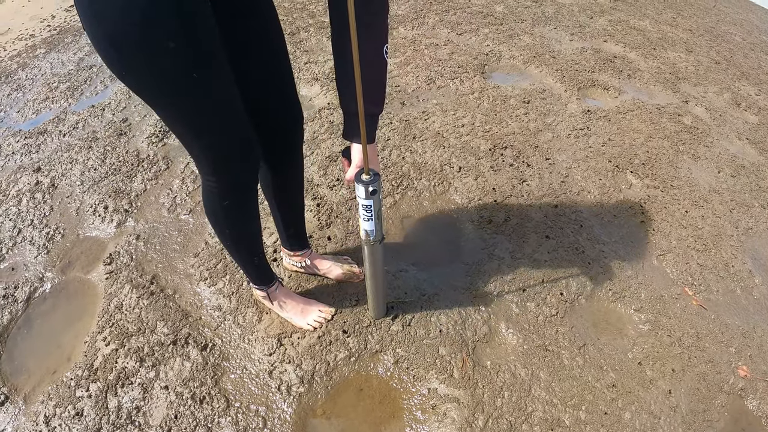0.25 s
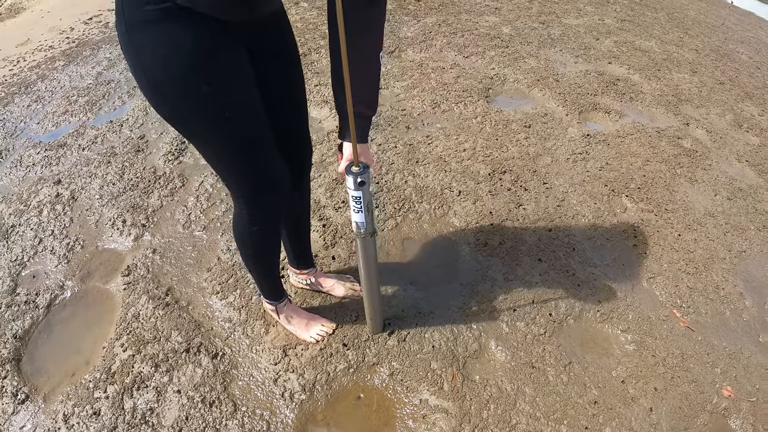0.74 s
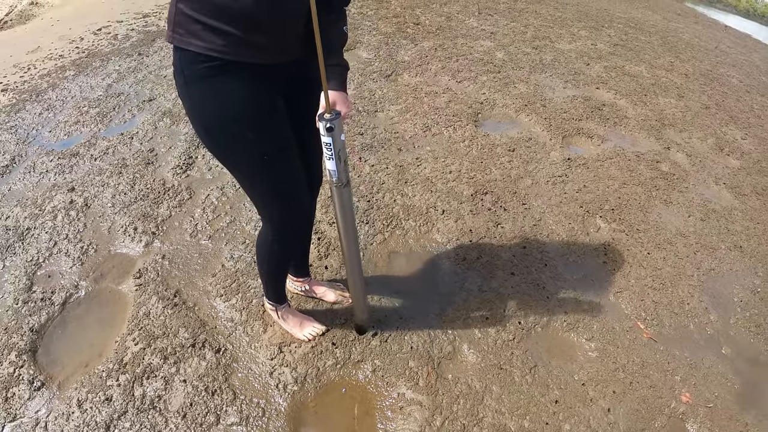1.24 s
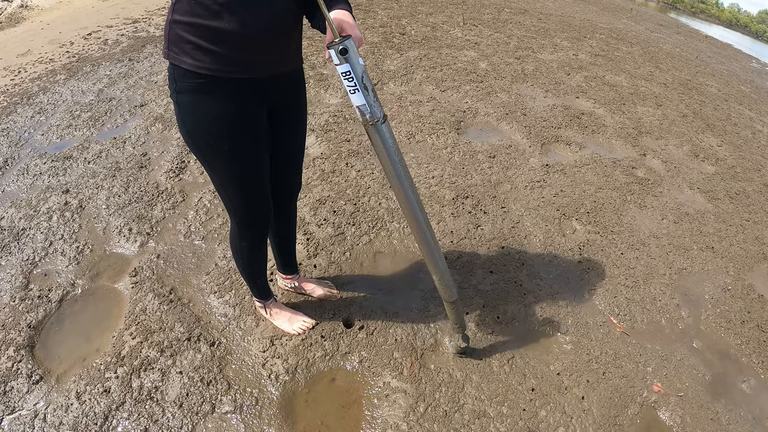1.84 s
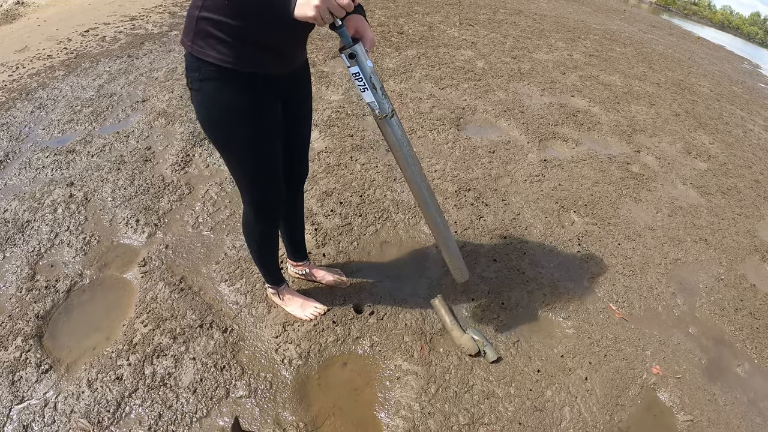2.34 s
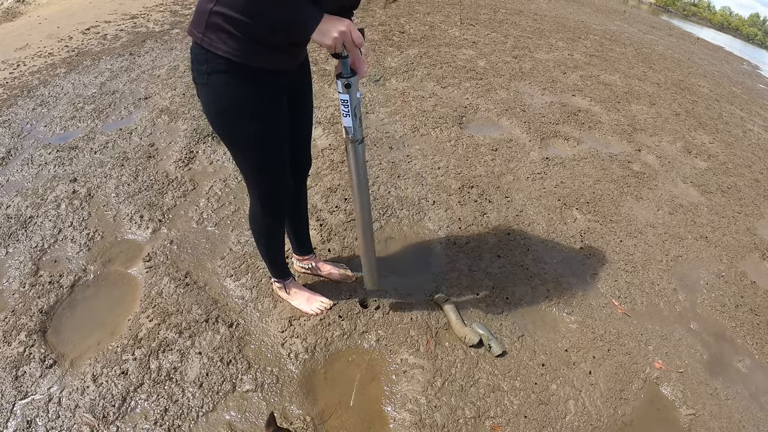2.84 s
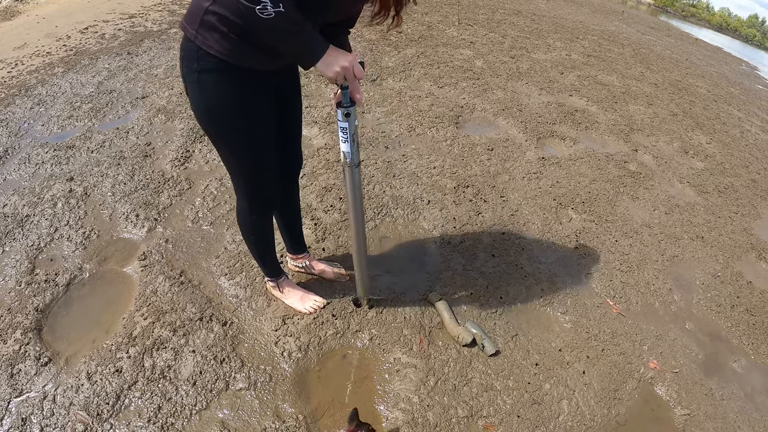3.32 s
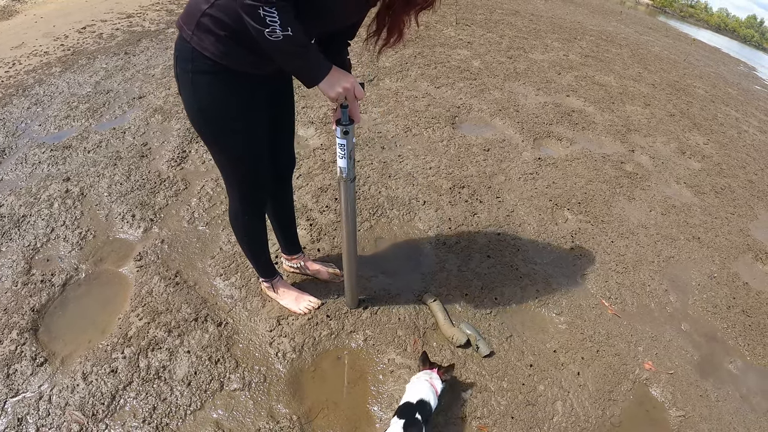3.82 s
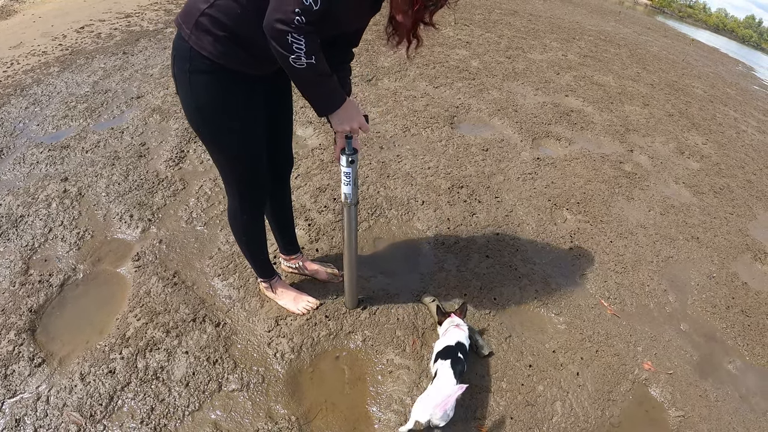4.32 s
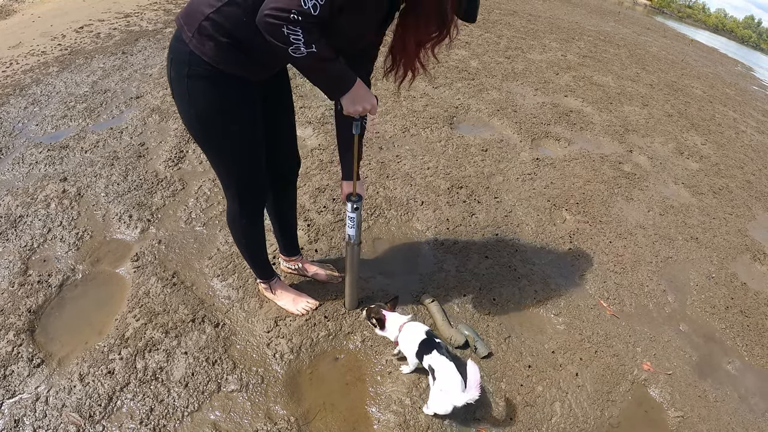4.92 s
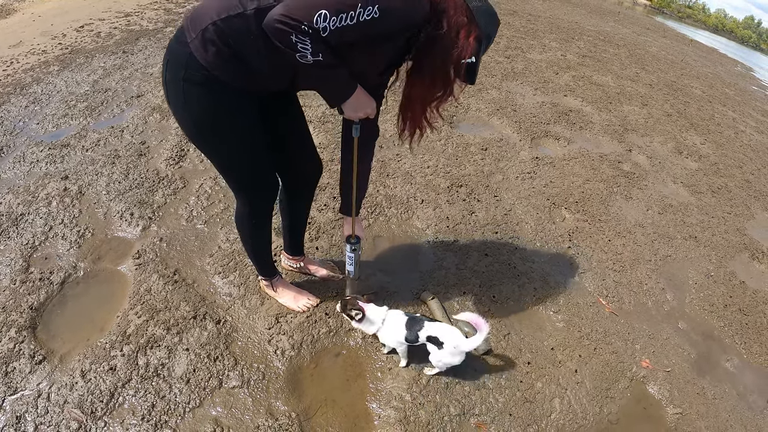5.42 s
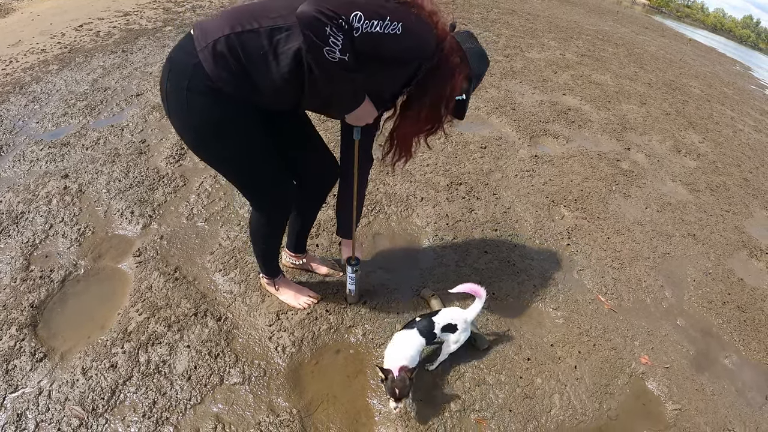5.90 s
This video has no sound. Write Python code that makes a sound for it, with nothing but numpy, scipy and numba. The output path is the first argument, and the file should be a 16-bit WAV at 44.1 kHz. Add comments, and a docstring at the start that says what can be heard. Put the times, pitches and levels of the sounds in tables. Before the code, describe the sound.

Throughout, low wind rumbles and flutters on the microphone over a faint wash of distant water and breeze. From 0 to 0.8 s a plunger rod whistles faintly as it rubs. At 0.85 s the barrel judders out of wet sand in rapid small slips, with harder cracks near 1.04 s, then squelches free with a hollow plop at 1.25 s. A few drips tick. From 1.7 to 2.15 s the core grinds out with swelling gritty hiss, a buzzing squeal and hollow hoots, stopped by a thud and short metallic ring. A light clack comes at 2.5 s. Wind buffets from 2.9 s, hardest around 4 to 4.6 s, amid wet stabs. At 4.7 to 5.1 s the washer squeals, breaking up, with gulps. A gargling slurp rises from 5.2 to 5.45 s, then bubbles crackle and drip to the end, with faint rod scraping.

```python
"""A steel bait pump is worked on a windy tidal flat; wind rumbles and flutters on the microphone throughout.
First the barrel judders out of wet sand in small slips, and comes free with squelches and a plop of damped tones.
The plunger then pushes the core out with gritty hiss, hoots and a squeal (a buzzing tone), and knocks on its stop.
The barrel is stabbed in again amid gusts, and the washer squeals on the up-stroke with breaks where it catches.
Last, air slurps through the slurry in pulses that ring a moving air pocket; bubbles crackle on in the hole."""
import sys
import numpy as np
from scipy import signal
from scipy.fft import rfft, irfft
from scipy.io import wavfile
from scipy.ndimage import uniform_filter1d
from numba import njit

SR = 44100
rng = np.random.default_rng(int(sys.argv[2]) if len(sys.argv) > 2 else 0)


def dump_mix(stems):
    """Bounce the given channels to the path in sys.argv[1] as a 16-bit WAV at rate SR."""
    frames = np.atleast_2d(stems).T  # one column per channel
    limited = np.clip(frames, -1, 1)  # hard clip at full scale
    pcm = np.round(limited * 32767).astype(np.int16)
    wavfile.write(sys.argv[1], SR, pcm)


N = 271559
T = np.arange(N) / SR  # time of every sample, s

PUSH_START_S, PUSH_END_S = 1.685, 2.16  # the core slides out at one go
# width of the stereo image: (start_s, level_db; 0 is fully open)
STEREO_WIDTH = [(0, -46), (1.8, -33), (2.6, -20.5), (3.3, -2)]
# washer on the up-stroke: (start_s, pitch_hz, level_db before the resonances lift it)
UP_STROKE_SQUEAL = [(4.675, 660, -62), (4.712, 700, -51), (4.755, 702.7, -50), (4.792, 655, -52.5),
                    (4.82, 451, -54), (4.85, 312.4, -57), (4.885, 299.6, -62), (4.905, 358.7, -52.5),
                    (4.924, 569.4, -50), (4.955, 610.6, -51), (4.978, 636.4, -42.5), (4.992, 650, -44.5),
                    (5.029, 655, -44), (5.048, 639, -54.5), (5.11, 630, -67)]


def undb(db):
    """Turn decibels into gain."""
    return 10 ** (np.asarray(db) / 20)


def unit(x):
    """Scale to rms 1."""
    return x / np.sqrt(np.mean(x ** 2))


def curves(table):
    """Join each column of a table by straight lines in time."""
    s, *columns = np.transpose(table)
    return [np.interp(T, s, c) for c in columns]


def during(table):
    """Give 1 while the table runs, with soft ends, and 0 elsewhere."""
    running = (T > table[0][0]) & (T < table[-1][0])
    return uniform_filter1d(1. * running, size=300)


def noise():
    """Make white noise."""
    return rng.standard_normal(N)


def walk(rate):
    """Wander at random with rms 1, with a new target rate times a second."""
    return unit(np.interp(T * rate, np.arange(8000), rng.standard_normal(8000)))


def colour(x, points):
    """Filter to the given (pitch_hz, level_db) outline, without ringing ahead of time; rms 1."""
    hz, db = np.transpose(points)
    bins = np.maximum(np.fft.rfftfreq(8192, 1 / SR), 1)
    octaves_below = np.maximum(np.log2(hz[0] / bins), 0)
    octaves_above = np.maximum(np.log2(bins / hz[-1]), 0)
    steep = np.minimum(30 * (octaves_below + octaves_above), 60)  # dB cut outside the outline
    outline_db = np.interp(np.log(bins), np.log(hz), db) - steep
    # folding the cepstrum forward makes the filter respond as early as it can
    cepstrum = irfft(np.log(undb(outline_db)))
    cepstrum[1:4096] *= 2
    cepstrum[4097:] = 0
    impulse = irfft(np.exp(rfft(cepstrum)))
    return unit(signal.fftconvolve(x, impulse)[:N])


def resonate(x, hz, width):
    """Two-pole resonance with gain 1 at its centre."""
    hz = min(hz, .4 * SR)
    b, a = signal.iirpeak(hz, hz / min(width, SR / 4), fs=SR)
    return signal.lfilter(b, a, x)


@njit
def glide(x, hz, width):
    """Band-pass whose centre moves; gain 1 at the centre."""
    y, band, low = np.empty(len(x)), 0., 0.
    for i in range(len(x)):
        g, k = np.tan(np.pi * hz[i] / SR), width / hz[i]
        v = (band + g * (x[i] - low)) / (1 + g * (g + k))
        band, low, y[i] = 2 * v - band, low + 2 * g * v, k * v
    return y


def grains(rate, spread_db):
    """Random clicks of very unequal size, about rate a second; rms 1."""
    size = undb(spread_db * np.minimum(rng.exponential(size=N), 4))
    happens = rng.random(N) < rate / SR
    return unit(happens * size * rng.choice([-1, 1], N))


def slips(rate, jitter, spread_db):
    """A click at each slip of a sticking contact, at uneven times and sizes; rms 1."""
    uneven_rate = rate * np.exp(jitter * walk(150))
    turns = np.floor(np.cumsum(uneven_rate) / SR)
    return unit(np.diff(turns, prepend=0) * undb(spread_db * walk(200)))


def place(x, s):
    """Put a short sound at time s."""
    out, start = np.zeros(N), int(np.clip(s * SR, 0, N - 1))
    out[start:start + len(x)] = x[:N - start]
    return out


def ring(s, hz, t60):
    """A damped sine from time s, falling by 60 dB in t60 seconds."""
    age = np.arange(SR // 2) / SR
    return place(np.sin(2 * np.pi * hz * age) * np.exp(-np.log(1000) * age / t60), s)


def smear(x, fall):
    """Give every click a short noisy tail of fall seconds; rms 1."""
    power = signal.lfilter([1], [1, -np.exp(-2 / (fall * SR))], x ** 2)
    return unit(np.sqrt(power) * noise())


def tube(x, hz, reflect, count=5):
    """Air column: sound runs up and down the barrel hz times a second, weaker on each round; rms 1."""
    gain = np.clip(reflect, 0, .8)
    return unit(sum(gain ** k * np.interp(T - k / hz, T, x) for k in range(count)))


def swell(s, rise, fall):
    """Envelope that grows to 1 at time s and dies away."""
    return np.exp(np.maximum(np.minimum((T - s) / rise, (s - T) / fall), -30))


def stroke(start, end, attack, release):
    """Envelope that eases in after start, holds, and eases out before end."""
    ease_in = 1 - np.exp(-np.maximum(T - start, 0) / attack)
    ease_out = 1 - np.exp(-np.maximum(end - T, 0) / release)
    return ease_in * ease_out


def spread(points, side_db):
    """Coloured noise plus a part at side_db that has opposite sign on left and right."""
    return colour(noise(), points) + undb(side_db) * colour(noise(), points) * np.array([[1], [-1]])


def wind(rumble_db=-1, eddy_db=2, flutter_db=-52, flutter_drift_db=-.3, churn_db=-38, churn_growth=1.33):
    """Eddies at the microphone: lopsided rumble, light flutter, churning that grows with the gust, hard buffets."""
    # strength of the gusts: (start_s, level_db before the eddies)
    gusts = [(0, -49), (.17, -42.5), (.8, -47), (1.1, -40), (1.5, -43), (1.8, -48), (2.7, -53),
             (2.91, -36.5), (3.0, -37.5), (3.2, -31.5), (3.32, -43), (3.55, -42), (3.67, -34),
             (3.77, -47.5), (3.9, -42), (4.0, -24.5), (4.06, -31.5), (4.12, -28), (4.18, -32), (4.24, -29),
             (4.32, -37.5), (4.54, -22.5), (4.7, -41), (4.95, -36), (5.07, -57), (5.39, -60), (5.47, -41.5),
             (5.74, -47), (5.96, -58), (6.16, -49)]
    # side the gusts come from: (start_s, left_minus_right_db)
    lean = [(3.3, -1), (3.6, -4), (4.5, -3.5), (4.9, -2.5), (6.1, -3.5)]
    # tone of the deep rumble and of the flutter: (pitch_hz, level_db)
    rumble_tone = [(8.8, -29), (15, 0), (42, 3), (86, -7.5), (114, -15), (237, -23), (295, -32),
                   (336, -37.5), (500, -46), (650, -75), (1100, -120)]
    flutter_tone = [(70, -13), (130, -0.5), (200, 2.5), (280, 0), (350, -10), (500, -19.5), (900, -49)]
    churn_tone = [(55, -6.5), (80, 6.5), (120, 3.5), (200, -4.5), (300, -12.5), (500, -27)]

    (gust_db,), (lean_db,), (width_db,) = curves(gusts), curves(lean), curves(STEREO_WIDTH)
    gust_db = gust_db + eddy_db * walk(22)
    rumble = spread(rumble_tone, side_db=width_db - 9.5) * undb(gust_db + rumble_db)
    churn = spread(churn_tone, side_db=width_db - 1.0)
    churn = churn * undb(churn_db + churn_growth * (gust_db + 25.5))  # churn_db holds at a gust of -25.5 dB
    flutter_level_db = flutter_db + flutter_drift_db * T + 2.2 * walk(35) + 1. * walk(3.7)  # drift: dB per s
    flutter = spread(flutter_tone, side_db=width_db - 24.0) * undb(flutter_level_db)
    sides = undb(np.array([lean_db, -lean_db]) / 2)
    return (rumble + churn + buffets()) * sides + flutter


def buffets(half_length_cycles=0.78, churn_db=-16):
    """Each eddy shoves the diaphragm to and fro once or twice, with finer turbulence riding on it."""
    # hard buffets of wind: (middle_s, level_db, pitch_hz)
    shoves = [(2.925, -28.5, 85), (3.165, -28, 62), (3.63, -38, 60), (4.003, -22.5, 50), (4.12, -26, 48),
              (4.238, -27, 91), (4.428, -30, 60), (4.493, -22.5, 116), (4.541, -19, 70), (4.576, -22.5, 52),
              (5.468, -35, 60), (5.567, -31, 35)]
    churn, out = colour(noise(), [(110, -1), (260, -3.5), (340, -14.5), (600, -25.5)]), 0
    for (s, db, hz), turn in zip(shoves, rng.random(len(shoves))):
        cycles = (T - s) * hz
        shove = np.sin(2 * np.pi * (cycles + turn)) + undb(churn_db) * churn
        envelope = np.exp(-np.minimum((cycles / half_length_cycles) ** 2, 30))
        out = out + undb(db) * envelope * shove
    return out


def air(wash_db=-58.5):
    """Distant water and breeze: filtered noise, with a hiss that swells, sinks and turns brighter."""
    # level of the soft hiss, then of the bright hiss that comes up late and dips briefly: (start_s, level_db)
    soft_level = [(0, -62.5), (.9, -57.5), (1.6, -67), (2.95, -67), (3.25, -78), (3.5, -83), (3.72, -69.5),
                  (4.5, -79), (6.16, -78)]
    bright_level = [(1.3, -92), (3.9, -78.5), (3.98, -64), (4.22, -63), (4.4, -49), (4.5, -65), (4.56, -71),
                    (4.61, -55), (5.75, -59), (6.0, -56)]
    # tone of the wash and of both hisses: (pitch_hz, level_db)
    wash_tone = [(200, 3.5), (400, 0), (600, -2.5), (780, 2.5), (950, -4), (1300, -5), (2000, -14.5),
                 (3000, -29), (6000, -37)]
    soft_tone = [(700, -15.5), (1200, -10.5), (1900, 1), (2600, 0), (2950, 0.5), (3300, 1), (5000, -2.5),
                 (5800, -5.5), (6900, -7.5), (8300, -22.5), (12500, -23.5), (15500, -28)]
    bright_tone = [(530, -54), (900, -8), (1060, -17), (1270, -8), (1930, -15), (2200, -12.5),
                   (2510, -11.5), (2990, -13), (3650, -15.5), (4600, -13.5), (5300, -17), (6600, -16.5),
                   (7080, -12), (7500, -16), (8230, -22), (12300, -29), (15000, -44)]

    (soft_db,), (bright_db,), (width_db,) = curves(soft_level), curves(bright_level), curves(STEREO_WIDTH)
    wash = spread(wash_tone, side_db=width_db - 14.0) * undb(wash_db + 1 * walk(20))
    soft = spread(soft_tone, side_db=-30) * undb(soft_db + .5 * walk(10))
    bright = spread(bright_tone, side_db=-8) * undb(bright_db + .8 * walk(25))
    return wash + soft + bright


def scrape():
    """The plunger rod rubs through its cap with a faint narrow whistle, made of noise in two resonances."""
    # rubbing: (start_s, level_db)
    rubbing = [(0, -77), (.1, -64), (.17, -56.5), (.28, -68), (.45, -68), (.62, -65.5), (.85, -70),
               (1, -100), (5.5, -100), (5.54, -63), (5.64, -82), (5.71, -63), (5.85, -83), (5.95, -63),
               (6.16, -62)]
    (db,) = curves(rubbing)
    whistle = unit(resonate(resonate(noise(), 2990, 110), 2900, 300))
    return whistle * undb(db) * during(rubbing)


def drag(grit_db=-2.5, jerk_fall_s=0.0014, crack_db=-27):
    """The barrel creeps out of the sand in a train of small slips and a few hard jerks, each ringing the buried tube."""
    # barrel juddering out of the sand: (start_s, slips_per_s, level_db)
    judder = [(.853, 130, -50.5), (.87, 128, -53), (.935, 117, -52), (.965, 93, -54.5), (1.0, 82, -54),
              (1.04, 76, -53), (1.08, 80, -55), (1.13, 67, -68)]
    # hard jerks as the barrel first moves and as the sand lets go: (start_s, peak_db)
    hard_jerks = [(.853, -39), (1.029, -37.5), (1.0412, -35), (1.054, -34)]

    rate, db = curves(judder)
    clicks = slips(rate, jitter=.1, spread_db=1.2)
    grit = undb(grit_db) * smear(clicks, fall=.004)
    out = unit(buried(clicks + grit)) * undb(db) * during(judder)
    age = np.arange(SR // 40) / SR
    for s, peak_db in hard_jerks:
        crack = rng.standard_normal(len(age)) * np.exp(-age / jerk_fall_s)
        jerk = buried(crack) + undb(crack_db) * crack
        out = out + undb(peak_db) * place(jerk / np.abs(jerk).max(), s)
    return out


def buried(x):
    """The tube rings briefly; the sand around it swallows the treble."""
    # what the buried barrel rings with: (pitch_hz, width_hz, level_db)
    modes = [(824, 360, 5.5), (1360, 180, 3), (2270, 130, 0.5), (3630, 200, -7), (4180, 85, -13),
             (5500, 130, -20)]
    body = sum(undb(db) * resonate(x, hz, width) for hz, width, db in modes)
    return signal.sosfilt(signal.butter(6, 7000, fs=SR, output="sos"), body)


def drops(fall_s=0.0015, bubble_t60=0.036, bubble_share=0.38):
    """Bubbles burst and drops land: a few ms of crackle and one short ring each."""
    # single bubbles and drops: (start_s, level_db, pitch_hz)
    drop_list = [(0.875, -38, 3580), (.931, -39, 4970), (1.421, -46, 2070), (1.472, -38.5, 4050),
                 (1.52, -45.5, 3600), (2.247, -50, 5360), (2.377, -46, 3550), (4.579, -40, 3800),
                 (5.1245, -31.5, 1337), (5.1651, -38, 1397), (5.464, -40, 1450), (5.475, -36.5, 1510),
                 (5.494, -35, 1400), (5.535, -41, 1643), (5.632, -35, 1660), (5.677, -38, 1650),
                 (5.765, -43.5, 1300), (5.8068, -40, 1350), (5.838, -41, 1300), (6.034, -34, 1350),
                 (6.11, -36.5, 1450)]
    age, out = np.arange(SR // 40) / SR, 0
    for s, db, hz in drop_list:
        burst = rng.standard_normal(len(age)) * np.exp(-age / fall_s)
        tick = resonate(resonate(burst, hz, 0.46 * hz), hz, 1.1 * hz)
        bubble = ring(s, hz, bubble_t60 * 1400 / hz)  # small bubbles die sooner; bubble_t60 holds at 1400 Hz
        out = out + undb(db) * (place(tick / np.abs(tick).max(), s) + bubble_share * bubble)
    return signal.sosfilt(signal.butter(4, 7000, fs=SR, output="sos"), out)


def squelches(rise_oct_per_s=23, range_oct=0.23):
    """Each squelch is a swelling and dying swarm of bursting water films in a closing cavity."""
    # wet sand tearing or being stabbed: (peak_s, level_db, rise_s, fall_s, cavity_hz, width_hz)
    swarms = [(1.244, -34, 0.0016, 0.0055, 2290, 2500), (1.265, -31, 0.0098, 0.0058, 2900, 5800),
              (1.274, -32, 0.0052, 0.013, 3200, 6500), (2.146, -33.5, 0.0024, 0.0022, 2570, 5170),
              (2.502, -50, .002, .014, 3480, 7000), (4.29, -50.5, .0088, .009, 2000, 4000),
              (4.374, -32.5, 0.0029, 0.0092, 1730, 603), (4.452, -37, 0.0071, .006, 2440, 760),
              (4.616, -37, 0.0023, 0.0083, 3280, 6500), (4.831, -45, 0.0051, .0036, 3500, 7000),
              (4.928, -38, .0034, 0.0064, 3930, 6000)]
    # tone of the bursting films: (pitch_hz, level_db)
    film_tone = [(200, -42), (600, 19), (2200, 9), (4200, 6), (6800, 2.5), (8300, -15), (12500, -12),
                 (15500, -20)]
    films, out = colour(grains(rate=9000, spread_db=1.5), film_tone), 0
    for s, db, rise, fall, hz, width in swarms:
        # a cavity rings higher as it is squeezed shut
        octaves = np.clip(rise_oct_per_s * (T - s), -range_oct, range_oct)
        cavity = unit(glide(films, hz * 2 ** octaves, float(width)))
        out = out + undb(db) * swell(s, rise, fall) * cavity
    return out


def knocks(stop_s=2.144, ring_db=-40, clack_s=2.501, clack_db=-46):
    """Damped tones: the hole pops as suction breaks, the plunger rings the barrel at its stop, then clacks."""
    # dull pops of the hole, the plunger and wet sand: (start_s, level_db, pitch_hz, t60_s)
    pops = [(1.251, -19.5, 220, 0.015), (1.2607, -24, 268, 0.082), (1.2716, -11.5, 224, 0.014),
            (2.148, -19.5, 127, 0.027), (2.494, -35, 820, 0.011)]
    # steel barrel, then the loose plunger clacking as the pump swings back: (pitch_hz, level_db, t60_s)
    barrel_modes = [(816, 1.5, 0.1), (1215, -8, 0.097), (1630, -12, 0.19), (2190, -5.5, 0.15),
                    (2770, -15, 0.12), (2850, 5.5, 0.04), (5140, -33, 0.13)]
    clack_modes = [(880, -5, .05), (1810, -5, .03), (2780, 0, .035), (3400, 0, .035), (4820, 0, .03)]
    thumps = sum(undb(db) * ring(s, hz, t60) for s, db, hz, t60 in pops)
    barrel = undb(ring_db) * sum(undb(db) * ring(stop_s, hz, t60) for hz, db, t60 in barrel_modes)
    clack = undb(clack_db) * sum(undb(db) * ring(clack_s, hz, t60) for hz, db, t60 in clack_modes)
    return thumps + clack + barrel


def push(level_db=-39, start_hz=790, fall_hz_per_s=330, whistle_db=-47, squeak_db=-6):
    """The core grinds along the steel; the air column behind it lengthens, and the emptying barrel hoots hollowly."""
    # tone of the grinding grit: (pitch_hz, level_db)
    grit_tone = [(400, -16), (800, -3.5), (1100, -7.5), (1400, -6), (2400, -7), (3100, -5), (3650, -5.5),
                 (4400, -7.5), (5300, -13), (6600, -17), (8500, -31), (10800, -44.5), (12600, -30),
                 (15000, -45)]
    # lumps of the core leaving the barrel: (peak_s, level_db, pitch_hz, glide_hz_per_s)
    lumps = [(1.69, -46, 540, 2500), (1.855, -44, 585, -1000), (2.0, -43, 640, -1300),
             (2.062, -36, 580, 2600)]
    # the core gathers speed and is braked just before the stop
    hiss = undb(level_db) * stroke(PUSH_START_S, PUSH_END_S, attack=0.18, release=0.03)
    column_hz = start_hz - fall_hz_per_s * np.clip(T - PUSH_START_S, 0, 1)
    column_hz = column_hz * (1 + .03 * walk(45))
    grit = colour(grains(rate=4500, spread_db=2.9), grit_tone)
    grit = tube(grit, column_hz, reflect=.33) * undb(1.6 * walk(90))
    # air leaking past the washer whistles as soon as the core moves
    whistle = unit(resonate(resonate(noise(), 3560, 220), 4020, 700))
    whistle = whistle * np.minimum(hiss, undb(whistle_db))
    return (grit + undb(squeak_db) * squeaks()) * hiss + sum(hoot(*row) for row in lumps) + whistle


def squeaks(low_hz=2200, high_hz=4500, fall_oct_per_s=1.82, length_s=0.053, count=30):
    """Grains caught between core and steel each give a short falling squeak; rms near 1 during the stroke."""
    age, out = np.arange(int(length_s * SR)) / SR, 0
    starts = np.linspace(PUSH_START_S, PUSH_END_S, count)
    for s, (pitch, size) in zip(starts, rng.random((count, 2))):
        first_hz = low_hz * (high_hz / low_hz) ** np.sqrt(pitch)
        hz = first_hz * 2 ** (-fall_oct_per_s * age)
        squeak = np.hanning(len(age)) * np.sin(2 * np.pi * np.cumsum(hz) / SR)
        out = out + 2 * size * place(squeak, s)
    return out


def hoot(s, db, hz, hz_per_s, breath_db=-5):
    """A lump slides from the mouth and the hollow behind it rings: a gliding tone in a band of rushing air."""
    centre = hz + hz_per_s * np.clip(T - s, -.05, .05)
    phase = 2 * np.pi * np.cumsum(centre * (1 + .03 * walk(200))) / SR
    tone = np.sqrt(2) * np.sin(phase)
    rush = unit(glide(glide(noise(), centre, 150.), centre, 500.))
    return undb(db) * swell(s, rise=0.017, fall=0.031) * unit(tone + undb(breath_db) * rush)


def squeal(table, lifts, partials, jitter, flutter_db):
    """The wet washer sticks and slips on the barrel wall; partials flare at a resonance; grit makes them waver."""
    hz, db = curves(table)
    phase, out = 2 * np.pi * np.cumsum(hz * (1 + jitter * walk(300))) / SR, 0
    for k, partial_db in enumerate(partials, 1):
        lift_db = sum(lift / (1 + (2 * (k * hz - centre) / width) ** 2) for centre, width, lift in lifts)
        level_db = db + partial_db + lift_db + flutter_db * walk(130)
        out = out + undb(level_db) * np.sin(k * phase)
    return np.sqrt(2) * out * during(table)


def down_squeal():
    """The washer slips on the down-stroke, and narrow barrel resonances lift partials passing through them."""
    # washer on the down-stroke: (start_s, pitch_hz, level_db before the lifts)
    down_path = [(1.702, 704, -49), (1.715, 740, -48), (1.757, 781.6, -44.5), (1.775, 781, -58.5),
                 (1.828, 796.5, -42), (1.865, 777, -51), (1.915, 785.4, -47.5), (1.948, 754, -50),
                 (1.975, 720, -66)]
    # narrow barrel resonances: (pitch_hz, width_hz, lift_db)
    down_lifts = [(796.3, 55, 18), (1480, 110, 8)]
    # strength of partials 1 to 5: level_db
    down_partials = [-0.5, -4.5, -13, -16, -20]
    return squeal(down_path, down_lifts, down_partials, jitter=.019, flutter_db=2.2)


def up_squeal():
    """The washer slips on the up-stroke under other barrel resonances, and breaks off where it catches."""
    # narrow barrel resonances: (pitch_hz, width_hz, lift_db)
    up_lifts = [(706, 39, 13.4), (1268, 120, 21), (2100, 130, 6), (3320, 220, 5)]
    # strength of partials 1 to 5: level_db
    up_partials = [-3, -2, -4, -8, -8]
    return stutter() * squeal(UP_STROKE_SQUEAL, up_lifts, up_partials, jitter=.019, flutter_db=2.3)


def stutter(depth=0.89):
    """The squeal drops out for an instant at each catch of the washer."""
    # catches: (middle_s, half_length_s)
    catch_list = [(4.958, 0.0017), (4.9855, 0.0026), (5.0, 0.0022), (5.013, .0016), (5.022, 0.004),
                  (5.038, .0025)]
    dips = [1 - min(depth, 1) * np.exp(-((T - s) / length) ** 2) for s, length in catch_list]
    return np.prod(dips, axis=0)


def draw(pocket_db=-0.5, crackle_db=-6.5, washer_spray_db=1.5, washer_bubble_db=-9,
         spray_db=-33.5, spray_growth=1.9, column_hz=565):
    """Air bursts through the slurry in quick uneven pulses that ring a changing pocket and throw fine spray."""
    # gulps of slurry during the up-stroke: (peak_s, flow_db, pocket_hz)
    gulps = [(4.689, -39.5, 696), (4.829, -35.5, 911), (4.908, -42.5, 929.6), (5.068, -36.5, 804.8)]
    # the long slurp when air breaks in: (start_s, flow_db, pocket_hz)
    slurp = [(5.16, -65, 745), (5.229, -42, 806), (5.237, -34.5, 880), (5.27, -32.5, 941.5),
             (5.303, -32, 900), (5.308, -36.5, 890), (5.316, -31.5, 910), (5.344, -30.5, 1037),
             (5.392, -28.5, 1108), (5.405, -33, 1113), (5.415, -30.5, 1069), (5.428, -44, 987),
             (5.46, -63, 955)]
    # resonances of the air pocket: (multiple of its pitch, width_hz, level_db)
    pocket_modes = [(.64, 90, -19), (1, 50, -6), (1.22, 70, -6), (1.8, 90, -10)]
    # steady air resonances of the barrel and its mouth: (pitch_hz, width_hz, level_db)
    throat_modes = [(1275, 120, -2), (3300, 250, -17)]
    # tone of the spray: (pitch_hz, level_db)
    spray_tone = [(1200, -4), (1600, 3.5), (2300, 3), (3200, 5), (3900, -1), (4600, 0), (5300, -4.5),
                  (7800, -8.5), (10900, -21.5), (12200, -19), (15000, -43)]

    slurp_db, _ = curves(slurp)
    _, pocket_hz = curves(gulps + slurp)
    flow = undb(slurp_db) * during(slurp)
    flow = flow + sum(undb(db) * swell(s, rise=0.016, fall=0.024) for s, db, _ in gulps)
    # the squealing washer spits and bubbles too
    washer = undb(curves(UP_STROKE_SQUEAL)[1]) * during(UP_STROKE_SQUEAL)

    bursts = slips(rate=420, jitter=.2, spread_db=1.3)
    puffs = gargle()
    drive = (bursts + 0.47 * noise()) * puffs
    pockets = sum(undb(db) * glide(drive, ratio * pocket_hz, float(width)) for ratio, width, db in pocket_modes)
    pockets = pockets + sum(undb(db) * resonate(drive, hz, width) for hz, width, db in throat_modes)
    pockets = undb(pocket_db) * colour(pockets, [(250, 4.8), (1800, 3.4), (3500, 1.2)])
    pockets = pockets + pocket_tones(pocket_hz)

    crackle = undb(crackle_db) * smear(slips(rate=130, jitter=.5, spread_db=2), fall=.001)
    spray = colour(.5 * bursts + smear(bursts, fall=0.0036) + crackle, spray_tone) * np.sqrt(puffs)
    spray = tube(spray, column_hz, reflect=0.4)  # the air column with the plunger drawn up

    # spray_db holds at a flow of -30 dB; spray_growth is dB of spray per dB of flow
    relative_flow = flow / undb(-30)
    bubble_level = flow + undb(washer_bubble_db) * washer
    spray_level = undb(spray_db) * relative_flow ** spray_growth + undb(washer_spray_db) * washer
    return pockets * bubble_level + spray * spray_level


def gargle(puff_hz=165.2, deepen_from_s=5.7, deepen_s=.08):
    """The slurry part-shuts and bursts open again: uneven puffs with a sharp start, rms near 1."""
    turns = np.cumsum(puff_hz * np.exp(.25 * walk(120))) / SR
    pulses = uniform_filter1d(np.exp(-(turns % 1) / .4), size=24)
    puffs = unit(pulses * undb(1.5 * walk(150)))
    depth = np.clip((T - deepen_from_s) / deepen_s, .4, .72)  # stays at 0.4 for the whole slurp
    return 1 + depth * (puffs - 1)


def pocket_tones(pocket_hz):
    """The air pocket sings with a slight rasp when air streams through."""
    # sung tones: (multiple of the pocket's pitch, level_db)
    sung = [(.365, -15), (.99, -9.5)]
    phase = 2 * np.pi * np.cumsum(pocket_hz * (1 + .025 * walk(250))) / SR
    return np.sqrt(2) * sum(undb(db + 2 * walk(90)) * np.sin(ratio * phase) for ratio, db in sung)


def seep(start_s=5.43, db=-55, fade_db_per_s=-5, rush_db=5, rush_s=0.04):
    """Small bubbles burst in the barrel as the slurp ends: a short rush, then a slow fade."""
    # resonances of the filled barrel: (pitch_hz, width_hz, level_db)
    filled_modes = [(1310, 140, 3.5), (1640, 170, -3), (2140, 200, -12.5), (3200, 160, -10),
                    (4400, 330, -18)]
    bubbles = smear(slips(rate=85, jitter=.55, spread_db=2), fall=.0025)
    fizz = sum(undb(mode_db) * resonate(bubbles, hz, width) for hz, width, mode_db in filled_modes)
    fizz = colour(fizz, [(1100, 0), (5000, 0)])
    age = np.maximum(T - start_s, 0)
    level_db = db + fade_db_per_s * age + rush_db * np.exp(-age / rush_s)
    return fizz * (T > start_s) * undb(level_db)


def ports(x, lag_s=2.4e-5, most_turn_rad=.42, treble_db=6.5):
    """As the stereo image opens, the right port leads slightly; while narrow, it is only brighter at the very top."""
    hz, sides, spectrum = np.fft.rfftfreq(N, 1 / SR), np.array([[-.5], [.5]]), rfft(x)
    turn = np.minimum(2 * np.pi * hz * lag_s, most_turn_rad)
    wide = irfft(spectrum * np.exp(1j * sides * turn), N)
    top = np.clip((hz - 7000) / 3000, 0, 1)  # grows from 7 to 10 kHz
    narrow = irfft(spectrum * undb(sides * treble_db * top), N)
    opening = np.minimum(undb(curves(STEREO_WIDTH)[0]), 1)
    return narrow + opening * (wide - narrow)


def scene():
    """The pump stands straight ahead in the open, without echoes; the wind reaches each side on its own."""
    pull_and_empty = scrape() + drag() + squelches() + knocks() + push() + down_squeal()
    refill = up_squeal() + draw() + seep()
    return ports(pull_and_empty + refill + drops() + air()) + wind()


def record(dry):
    """A steep low-pass removes the treble above 15.6 kHz."""
    return signal.sosfilt(signal.ellip(8, .2, 70, 15600, fs=SR, output="sos"), dry)


dry = scene()
out = record(dry)
dump_mix(out)
```